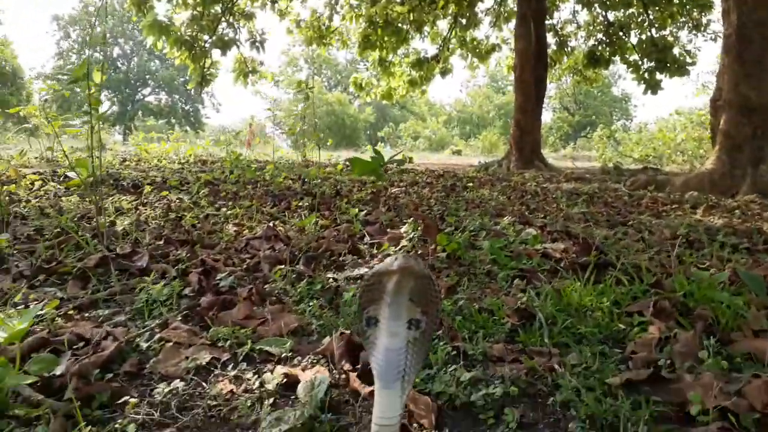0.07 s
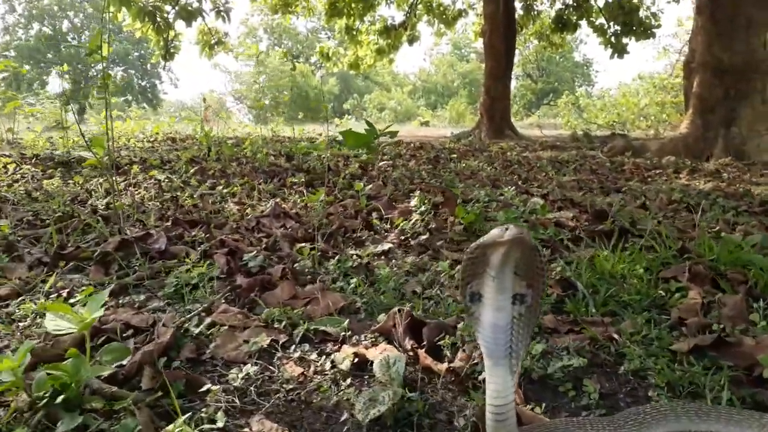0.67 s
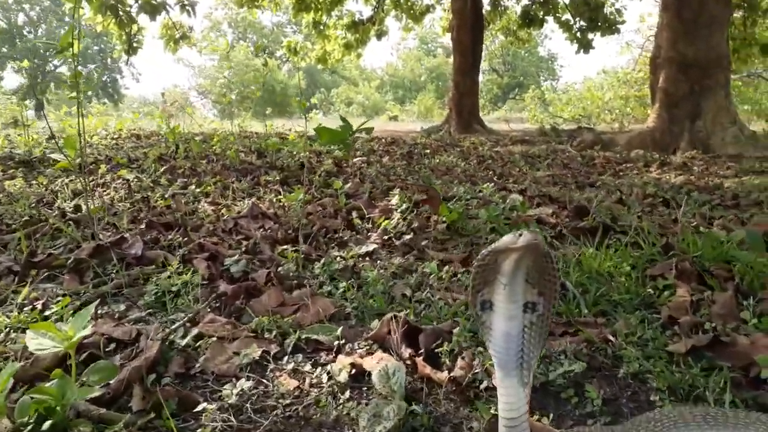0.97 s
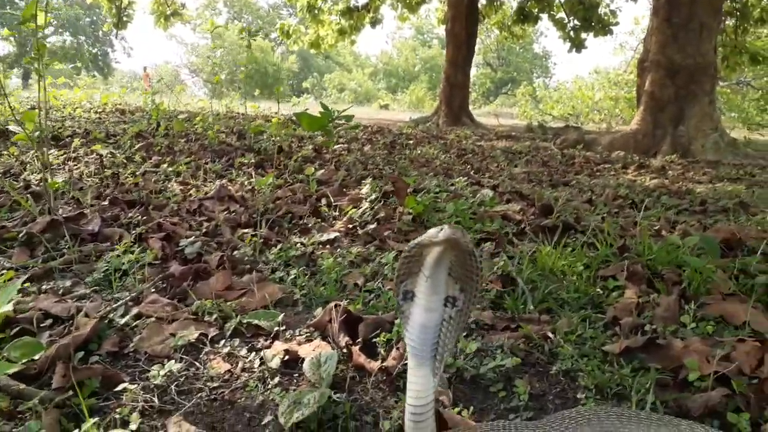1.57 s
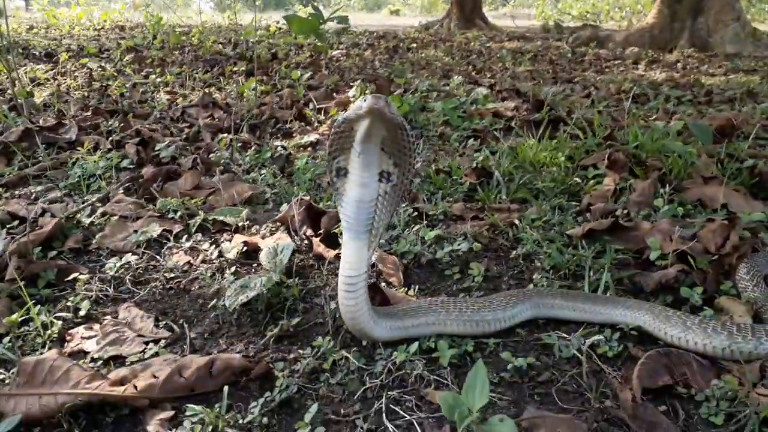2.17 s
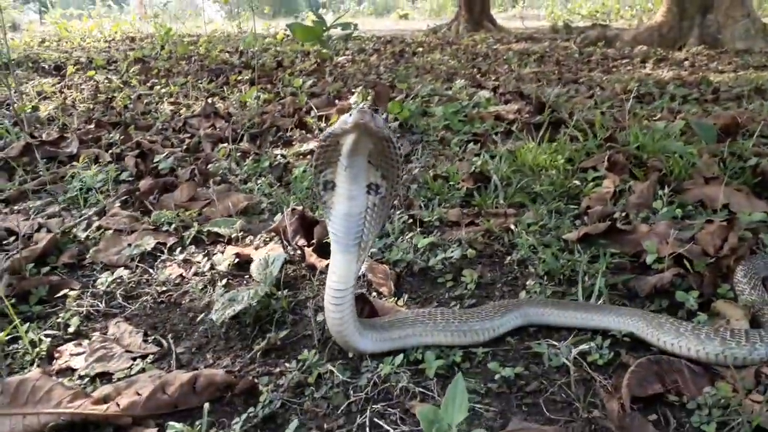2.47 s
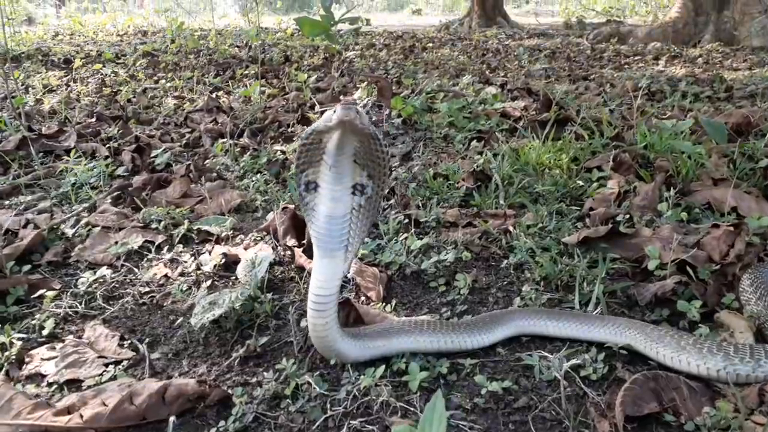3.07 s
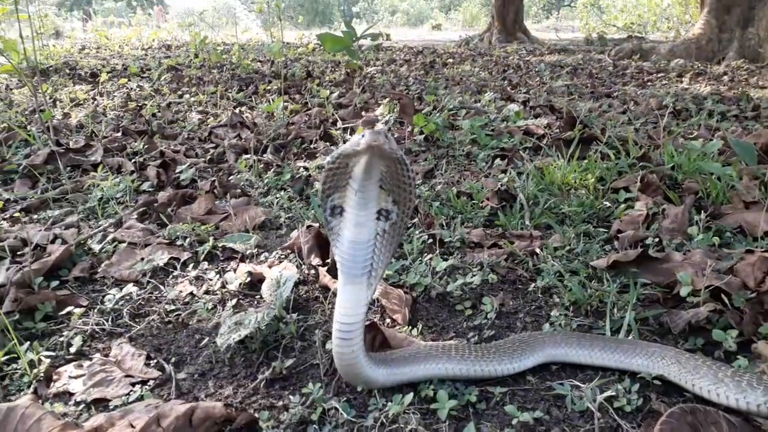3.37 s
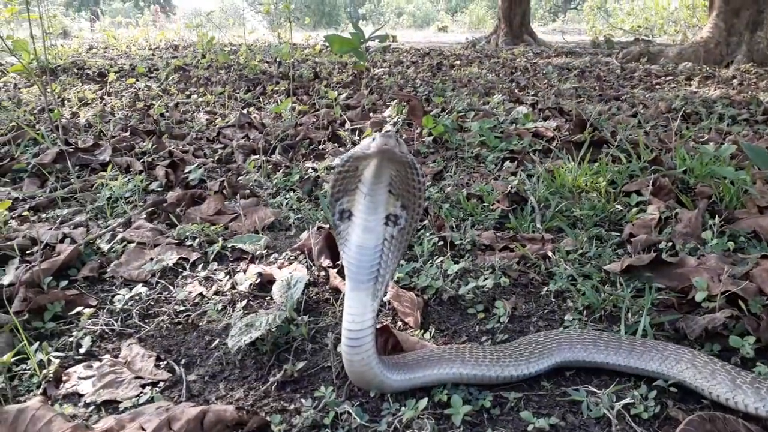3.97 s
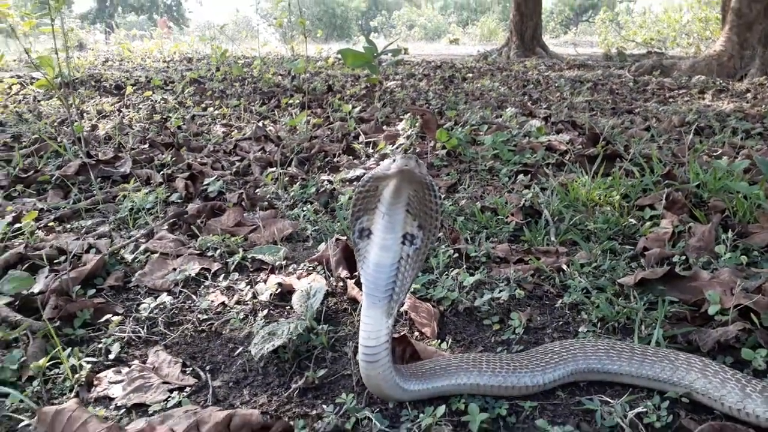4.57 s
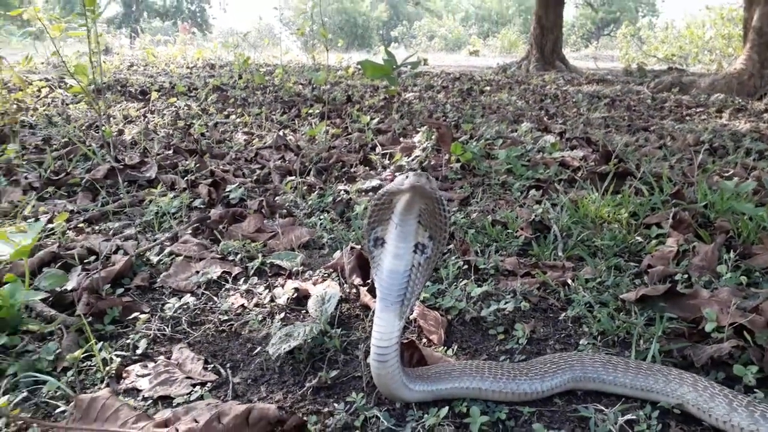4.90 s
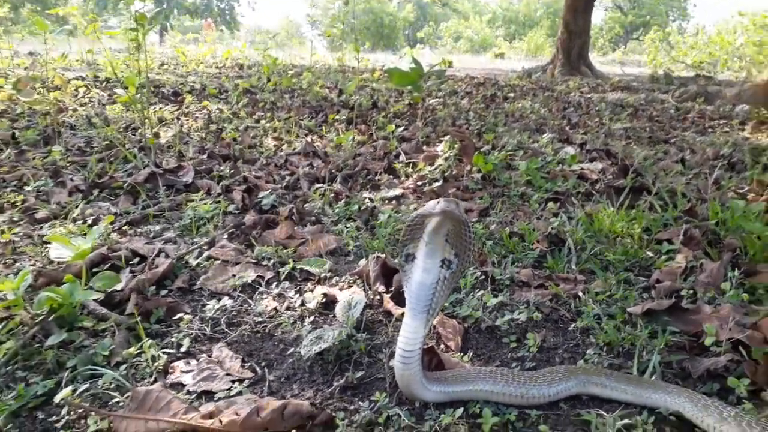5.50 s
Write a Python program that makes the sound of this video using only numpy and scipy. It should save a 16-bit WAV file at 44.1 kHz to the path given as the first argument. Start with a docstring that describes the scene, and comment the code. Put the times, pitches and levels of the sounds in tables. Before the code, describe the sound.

A cobra hisses close to the microphone in quiet woodland with a faint, far rumble. From the start to about 1.2 seconds it draws in air with a thin, soft, slightly whistly hiss. At 1.3 seconds it begins a hollow, breathy blow that swells to the loudest point around 2.6 seconds and stops at 3. A fainter inward hiss follows from 3.1 to 4.5 seconds. From 4.6 seconds a second blow builds until the end, near 5.6 seconds, carrying a slight wavering moan. Throughout, a small bird farther away repeats a short, high, rising whistle about twice a second, lightly echoed by the trees. Dry leaves tick here and there, mostly in the first second or so. Three faint, very high pips come around 3.3 to 3.5 seconds. Soft, low handling bumps occur between 4.2 and 4.5 seconds and again near 5.5.

```python
"""A cobra hissing in woodland

Close to a hand-held camera, a hooded cobra twice draws air through its narrow glottis in a thin hiss
and forces it out in a swelling, hollow blow: turbulent noise shaped by mouth and windpipe resonances.
The last blow also moans. A small bird repeats a rising whistle, scattered by the trees; dry leaves tick,
a few high pips sound, and the hand bumps the camera softly over a faint, far rumble."""
import sys
import numpy as np
from scipy import signal
from scipy.fft import rfft, irfft, next_fast_len
from scipy.io import wavfile
from scipy.ndimage import map_coordinates

SR = 44100
rng = np.random.default_rng(int(sys.argv[2]) if len(sys.argv) > 2 else 0)


def transcribe(signal):
    """Save signal, clipped to [-1, 1], as a 16-bit WAV file at the path in sys.argv[1]."""
    frames = np.atleast_2d(signal).T
    limited = np.clip(frames, -1, 1)
    pcm = np.round(limited * 32767).astype(np.int16)
    wavfile.write(sys.argv[1], SR, pcm)


N = 248724

# Spectrum of still woodland air with a far rumble: frequency_hz, density_db
AIR_SPECTRUM = [(20, -28), (45, -12.5), (80, -4), (135, -0.5), (200, -5), (300, -8.5), (700, -12),
                (1500, -12.5), (2200, -11.5), (3300, -18.5), (5000, -17), (8000, -23.5), (13000, -28.5),
                (16000, -21.5)]
# Spectrum of the self-noise that differs between the microphones: frequency_hz, density_db
SELF_NOISE_SPECTRUM = [(18, -49), (30, -18), (124, -4.5), (721, -8), (1160, -7), (1430, -19), (3310, -11),
                       (8080, -43), (14400, -13.5), (16000, -12)]
# Soft bumps of the hand: centre_s, half_length_s, pitch_hz, level_db
HAND_BUMPS = [(4.19, .015, 90, -75), (4.26, .018, 70, -68), (4.42, 0.044, 56, -63.5),
              (4.512, 0.024, 88, -67), (5.454, 0.032, 94.5, -54.5)]
# The clearest dry leaf ticks: start_s, level_db, pitch_hz, width_octaves
LEAF_TICKS = [(.2015, -49, 9000, 1.4), (.307, -43.5, 1600, 0.35), (.4682, -38.5, 3540, 1.1),
              (.4855, -43, 2300, .63), (.9885, -44, 2180, 1.4), (1.172, -47, 2300, 0.54),
              (1.228, -56, 9500, .4), (3.1067, -48, 11000, 0.84), (3.116, -49, 2820, 0.74),
              (3.622, -43.5, 1900, 1.0), (4.4866, -48, 4700, 0.82), (4.5655, -51.5, 8050, 1.6),
              (4.958, -42, 8000, 2.2), (5.272, -49, 4066, .19)]
# Thin, high double ticks: start_s
PIP_STARTS = [3.293, 3.372, 3.47]
# Bird whistles: start_s, length_s, lift_hz, level_db
BIRD_WHISTLES = [(-.05, 0.15, 437, -49.5), (0.497, 0.14, 52, -48.5), (1.028, 0.13, 50, -46),
                 (1.481, 0.13, -200, -49), (2.022, 0.14, 0, -48), (2.484, 0.12, -280, -48),
                 (3.185, 0.14, 377, -50), (3.887, .134, 432, -48.5), (4.701, 0.15, 260.5, -47.5),
                 (5.117, .125, -280, -47.5), (5.496, 0.12, -490, -46.5)]
# The course of every whistle: length_share, pitch_hz, lift_share
WHISTLE_CONTOUR = [(0, 3300, .7), (.07, 3650, .95), (.17, 3990, 1), (.5, 4600, .52), (.73, 5050, .2),
                   (.86, 5520, .1), (1, 6250, 0)]
# Reflection from foliage, stronger for higher notes: frequency_hz, gain_db
FOLIAGE_REFLECTION = [(3500, -11), (4600, -10), (5050, -9), (5400, -2), (6200, 3)]
# Reverberation time of the woodland: frequency_hz, t60_s
WOODLAND_DECAY = [(500, .3), (4000, .36), (10000, .3)]
# Lag of the ground's echo as the camera moves: time_s, lag_ms
GROUND_LAG = [(0, .84), (1.2, .87), (1.7, .87), (2.2, .835), (2.6, .82), (3.0, .82), (3.6, .85),
              (5.64, .85)]
# Inward strokes: start_s, fullest_s, end_s, attack_s, release_s, swell_db, sag_db, fullest_db
IN_STROKES = [(-.01, 0.343, 1.243, 0.032, 0.019, 4, 2.5, -59),
              (3.101, 3.55, 4.505, 0.028, 0.1, 4.5, 5.5, -63)]
# Broad spectrum, one list per inward stroke: frequency_hz, density_db
IN_SPECTRA = [
    [(100, -2), (300, -3), (700, -0.3), (1080, -4.5), (1800, 0.5), (2500, -6.5), (3450, -10), (4700, -8.5),
     (5850, -7), (7200, -12), (9700, -11.5), (13000, -9), (15600, -18)],
    [(100, -12), (300, -3.5), (700, 0.5), (1080, -6), (1800, -1.7), (2500, -12), (3450, -13), (4700, -6.5),
     (5850, -9), (7200, -11), (9700, -13), (13000, -9), (15600, -25)],
]
# Throat and mouth resonances, one list per inward stroke: centre_hz, width_hz, boost_db
IN_RESONANCES = [
    [(1480, 78, 7.5), (1910, 85, 5.5), (2950, 530, 11), (6390, 530, 14), (6770, 480, 12), (7750, 680, 13.5),
     (8900, 180, 9), (13000, 320, -2)],
    [(1470, 170, 14.5), (2080, 80, 10.5), (2910, 450, 16), (6300, 590, 9.5), (6610, 340, 11),
     (7560, 710, 12.5), (8800, 440, 8), (11200, 360, 6)],
]
# Outward strokes: start_s, fullest_s, end_s, attack_s, release_s, swell_db, sag_db, fullest_db
OUT_STROKES = [(1.286, 2.6, 3.03, 0.044, 0.078, 12.5, 4, -47), (4.622, 5.618, 5.9, .09, .09, 11.5, 4, -50)]
# How wide the glottis is forced open: time_s, force_share
GLOTTIS_FORCE = [(1.8, 0.08), (2.2, 0.94), (3.07, 1), (4.58, 0)]
# Broad spectra of the forced and of the gentle jet: frequency_hz, density_db
JET_SPECTRA = [
    [(400, -8.5), (750, -9), (1050, -6), (1700, -1.5), (2550, -6.5), (3400, -15.5), (4300, -8), (5800, -4),
     (7200, -1.5), (8200, -4.5), (9700, -10), (13000, -10.5), (15600, -8)],
    [(400, -6), (750, -3.5), (1050, -5), (1700, 0), (2550, -11), (3400, -11), (4300, -6.5), (5800, -0.3),
     (7200, 2.2), (8200, -5), (9700, -10.5), (13000, -8.5), (15600, -14)],
]
# Mouth resonances of the forced and of the gentle jet: centre_hz, width_hz, boost_db
JET_RESONANCES = [
    [(1324, 800, 9.5), (2120, 160, 7.5), (5190, 750, 8), (6700, 900, 6.5), (8600, 280, 10.5),
     (10400, 500, 5)],
    [(1199, 260, 14), (1500, 560, 3), (2224, 320, 9), (2820, 580, 6), (6170, 140, 9), (7580, 280, 5.5),
     (8700, 250, 5), (10700, 480, 5), (12700, 350, 7)],
]
# Hollow windpipe resonance, one list per outward stroke: frequency_hz, density_db
WINDPIPE_SPECTRA = [
    [(60, -37), (150, -23), (240, -8), (360, -2.5), (510, -1), (620, -11), (800, -20.5), (1300, -37)],
    [(60, -54), (170, -23), (270, -7), (385, -1), (500, -4), (660, -17), (900, -30), (1300, -44)],
]

RUSTLE_START_S, RUSTLE_END_S = .33, .9  # faint ticks while the snake shifts
RUSTLE_PER_S, RUSTLE_DB, RUSTLE_HZ = 10, -52.5, 4800
PIP_GAP_S, PIP_DB, PIP_HZ = 0.0098, -56, 9000
TWIGS_DB, TWIGS_T60_S = -9, .1
SWELL_POWER, SAG_POWER = 1.35, 1.8  # a swell flattens towards its top, a sag steepens
IN_PITCH_FACTOR, IN_SINK_PER_S = 1.012, .02
JET_RISE = .03  # share by which the mouth resonances rise from no flow to the fullest
PIPE_DB, PIPE_GROWTH = 2.36, 1.31  # windpipe over jet at the fullest flow; dB per dB of effort
MOAN_DB, MOAN_GROWTH = -51.5, 0.91  # level at the fullest flow; dB per dB of effort
MOAN_HZ, MOAN_POWER = 400, .21  # pitch at the fullest flow; power of the flow that it follows
BAND_LIMIT_HZ = 15800


def amp(db):
    """Amplitude ratio: tenfold for every 20 dB."""
    return 10 ** (np.asarray(db) / 20)


def unit(x):
    """Normalisation to rms 1."""
    return x / np.sqrt(np.mean(x ** 2) + 1e-20)


def clock():
    """Uniform sampling: the time of each sample in seconds."""
    return np.arange(N) / SR


def along(points, hz):
    """Interpolation of (frequency_hz, value) points on a logarithmic frequency axis."""
    knots_hz, values = np.transpose(points)
    return np.interp(np.log(hz + 1), np.log(knots_hz + 1), values)


def curve(points):
    """Linear interpolation of (time_s, value) points at every sample."""
    return np.interp(clock(), *np.transpose(points))


def wobble(knots_per_s):
    """Smooth random fluctuation: a spline through Gaussian knots."""
    knots = rng.standard_normal(int(N * knots_per_s / SR) + 4)
    return map_coordinates(knots, [clock() * knots_per_s])


def filtered(x, response):
    """Linear filtering: the spectrum is multiplied by a frequency response."""
    size = next_fast_len(N + SR // 4)
    hz = np.fft.rfftfreq(size, 1 / SR)
    return irfft(rfft(x, size) * response(hz), size)[..., :N]


def rush(spectrum, resonances=()):
    """Source and filter: white noise takes on a broad spectrum and resonance peaks, at rms 1."""
    def response(hz):
        boost_db = sum(db / (1 + (2 * (hz - centre) / width) ** 2) for centre, width, db in resonances)
        return amp(along(spectrum, hz) + boost_db)
    return unit(filtered(rng.standard_normal(N), response))


def band(centre_hz, octaves, size):
    """Band noise: random phases under a bell-shaped spectrum, at rms 1."""
    distance = np.log2((np.fft.rfftfreq(size, 1 / SR) + 1) / centre_hz) / octaves
    phase = 2 * np.pi * rng.random(len(distance))
    return unit(irfft(np.exp(1j * phase - distance ** 2 / 2), size))


def glide(x, factor):
    """Resampling at a varying speed slides all resonances by the same pitch factor."""
    return unit(map_coordinates(x, [np.cumsum(factor)], order=5, mode="wrap"))


def self_noise():
    """Microphone self-noise: a faint, steady floor that differs between the channels."""
    return amp(-78.5) * rush(SELF_NOISE_SPECTRUM)


def still_air():
    """Ambient noise: steady woodland air, strongest in a far, low rumble."""
    return amp(-64.5) * rush(AIR_SPECTRUM)


def hand_bumps():
    """Structure-borne sound: the shifting grip sends soft, low thuds through the camera body."""
    out = np.zeros(N)
    for centre_s, half_length_s, pitch_hz, level_db in HAND_BUMPS:
        envelope = np.exp(-((clock() - centre_s) / half_length_s) ** 2 / 2)
        out += amp(level_db) * envelope * band(pitch_hz, octaves=0.57, size=N)
    return out


def tick(start_s, level_db, pitch_hz, octaves):
    """A damped transient: a sharp crack and a faint rattle, their joint rms 19.5 dB under level_db."""
    t = np.arange(SR // 16) / SR
    crack = amp(-60 * t / 0.014)
    rattle = 0.14 * amp(-60 * t / 0.085)
    burst = unit((crack + rattle) * band(pitch_hz, octaves, size=len(t)))
    out = np.zeros(N + SR)
    out[round(start_s * SR):][:len(t)] = amp(level_db - 19.5) * burst
    return out[:N]


def dry_leaves():
    """Impulsive sources: snapping leaves give a few clear ticks and an early scatter of faint ones."""
    span_s = RUSTLE_END_S - RUSTLE_START_S
    chance = rng.random((round(RUSTLE_PER_S * span_s), 3))
    faint = [(RUSTLE_START_S + span_s * when, RUSTLE_DB + 4 * size, RUSTLE_HZ * 2 ** (2 * pitch - 1), .9)
             for when, size, pitch in chance]
    return sum(tick(*row) for row in LEAF_TICKS + faint)


def pips():
    """Narrow-band transients sound pitched: thin, high ticks in close pairs."""
    return sum(tick(start_s + lag_s, PIP_DB, PIP_HZ, octaves=0.092)
               for start_s in PIP_STARTS for lag_s in (0, PIP_GAP_S))


def bird():
    """Frequency modulation: each whistle leaps up, climbs with a waver and fades in an upward flick."""
    out = np.zeros(N)
    waver = 1 + .007 * wobble(260)
    beating_db = 2.8 * wobble(130) - 2.2  # paths through the foliage interfere
    length_share, contour_hz, lift_share = np.transpose(WHISTLE_CONTOUR)
    for start_s, length_s, lift_hz, level_db in BIRD_WHISTLES:
        progress = (clock() - start_s) / length_s
        pitch_hz = waver * np.interp(progress, length_share, contour_hz + lift_hz * lift_share)
        swell = np.interp(progress, [0, .12, .19, .55, .8, .9, 1.05], [.15, .45, .9, 1, .5, .32, .1])
        sounding = (progress > 0) & (progress < 1.05)
        out += amp(level_db) * swell * sounding * np.sin(2 * np.pi * np.cumsum(pitch_hz) / SR)
    return out * amp(beating_db)


def woodland_echo(x):
    """Diffuse reverberation: trunks and foliage return a short tail that favours the higher notes."""
    reflected = filtered(x, lambda hz: amp(along(FOLIAGE_REFLECTION, hz)))
    hz, t, noise = signal.stft(rng.standard_normal(SR // 2), SR, nperseg=256)
    build_up = np.minimum(t / .025, 1)
    decay = amp(-60 * t / along(WOODLAND_DECAY, hz)[:, None])
    _, tail = signal.istft(noise * build_up * decay, SR, nperseg=256)
    return signal.fftconvolve(reflected, tail / np.linalg.norm(tail))[:N]


def through_twigs(x):
    """Multipath scattering: twigs around the bird add dense, very short echoes that roughen its call."""
    t = np.arange(SR // 16) / SR
    paths = rng.standard_normal(len(t)) * amp(-60 * t / TWIGS_T60_S)
    return x + amp(TWIGS_DB) * signal.fftconvolve(x, paths / np.linalg.norm(paths))[:N]


def off_ground(x, echo_gain):
    """Comb filtering: the hiss interferes with its ground echo, whose lag shifts as the camera moves."""
    lag_samples = curve(GROUND_LAG) * SR / 1000
    echo = map_coordinates(x, [np.arange(N) - lag_samples])
    return unit(x - echo_gain * echo)


def stroke(start_s, fullest_s, end_s, attack_s, release_s, swell_db, sag_db):
    """Valve and bellows: the glottis's opening (0-1) and the lung's effort (0 dB at its fullest)."""
    t = clock()
    opening = np.clip(np.minimum((t - start_s) / attack_s, (end_s - t) / release_s), 0, 1)
    before = np.clip((fullest_s - t) / (fullest_s - start_s), 0, 1)
    after = np.clip((t - fullest_s) / (end_s - fullest_s), 0, 1)
    effort_db = -swell_db * before ** SWELL_POWER - sag_db * after ** SAG_POWER
    return opening, effort_db


def drawing_in():
    """Turbulence at a constriction: air sucked through the glottis hisses with whistly resonances."""
    out = np.zeros(N)
    for (start_s, *shape, fullest_db), spectrum, mouth in zip(IN_STROKES, IN_SPECTRA, IN_RESONANCES):
        opening, effort_db = stroke(start_s, *shape)
        # the resonances sink as the lung fills
        drift = IN_PITCH_FACTOR - IN_SINK_PER_S * np.clip(clock() - start_s, 0, 2)
        hiss = off_ground(glide(rush(spectrum, mouth), drift), echo_gain=0.035)
        flutter_db = 0.4 * wobble(25.2)
        out += opening * amp(fullest_db + effort_db + flutter_db) * hiss
    return out


def moan():
    """Lock-in: the last blow's flow sustains a windpipe resonance, whose pitch rises with the flow."""
    opening, effort_db = stroke(*OUT_STROKES[-1][:-1])
    waver = 1 + .015 * wobble(12) + .015 * wobble(60)
    pitch_hz = MOAN_HZ * amp(effort_db) ** MOAN_POWER * waver
    level_db = MOAN_DB + MOAN_GROWTH * effort_db + 2.8 * wobble(30)
    return opening * amp(level_db) * np.sin(2 * np.pi * np.cumsum(pitch_hz) / SR)


def blowing_out():
    """Jet noise and pipe resonance: a bright hiss at the glottis flutters with the windpipe's roar."""
    out = np.zeros(N)
    force = np.clip(curve(GLOTTIS_FORCE), 0, 1)
    forced, gentle = (rush(spectrum, mouth) for spectrum, mouth in zip(JET_SPECTRA, JET_RESONANCES))
    jet = off_ground(np.sqrt(force) * forced + np.sqrt(1 - force) * gentle, echo_gain=.37)
    fizz = filtered(jet, lambda hz: hz ** 8 / (hz ** 8 + 9000. ** 8))
    for (*shape, fullest_db), pipe_spectrum in zip(OUT_STROKES, WINDPIPE_SPECTRA):
        opening, effort_db = stroke(*shape)
        flow = amp(effort_db)
        flutter_db = .6 * wobble(45)
        pipe = glide(rush(pipe_spectrum), .8 + .26 * flow)  # the roar rises in pitch with the flow
        roar = amp(PIPE_DB + PIPE_GROWTH * effort_db) * pipe
        dulled_jet = jet - 0.17 * (1 - flow) * fizz  # a weak flow has less of the highest fizz
        hiss = flow * glide(dulled_jet, 1 + JET_RISE * (flow - .8))
        out += opening * amp(fullest_db + flutter_db) * (hiss + roar)
    return out


def scene():
    """Superposition: a near, dry snake and a far, echoing bird reach both microphones alike."""
    song = bird()
    echo = woodland_echo(song)
    snake = drawing_in() + blowing_out() + moan()
    mid = snake + through_twigs(song) + echo + dry_leaves() + pips() + hand_bumps() + still_air()
    side = self_noise()
    return np.array([mid + side, mid - side])


def record(dry):
    """Low-pass filtering: the camera keeps nothing above its band limit."""
    return filtered(dry, lambda hz: hz < BAND_LIMIT_HZ)


dry = scene()
out = record(dry)
transcribe(out)
```